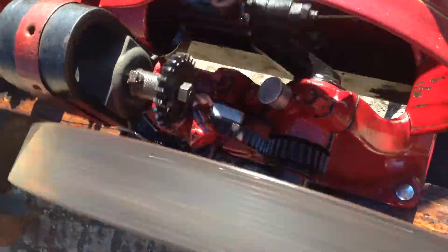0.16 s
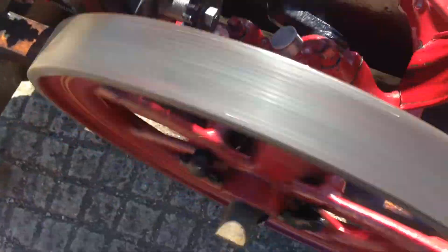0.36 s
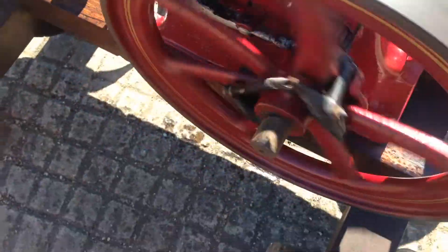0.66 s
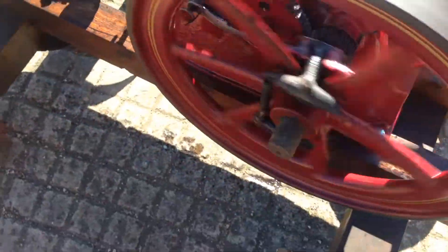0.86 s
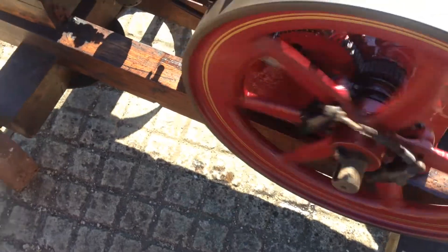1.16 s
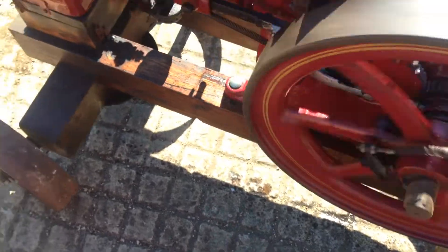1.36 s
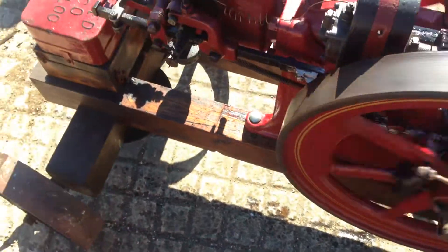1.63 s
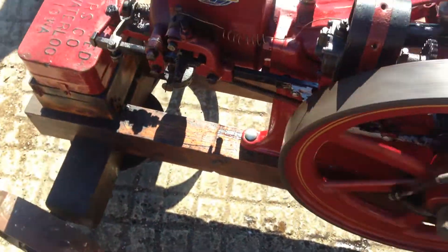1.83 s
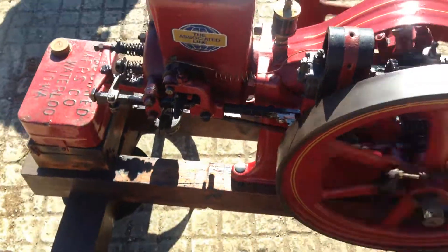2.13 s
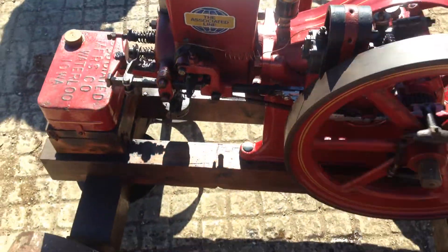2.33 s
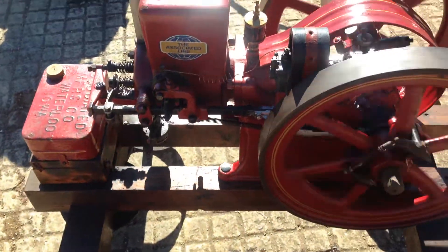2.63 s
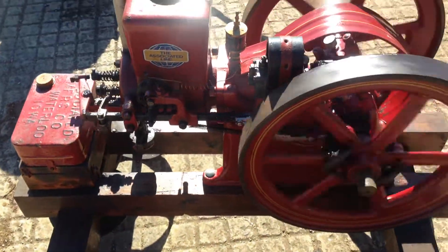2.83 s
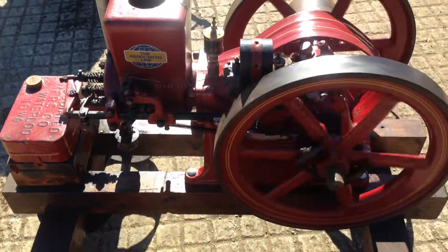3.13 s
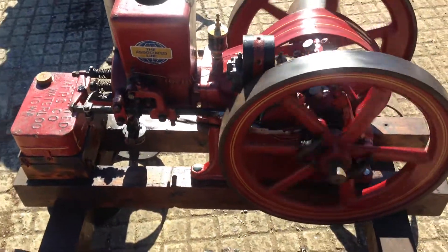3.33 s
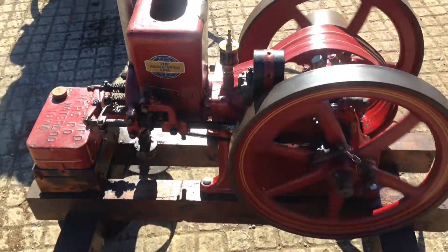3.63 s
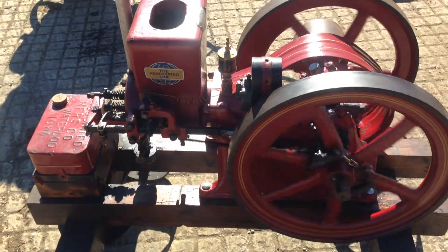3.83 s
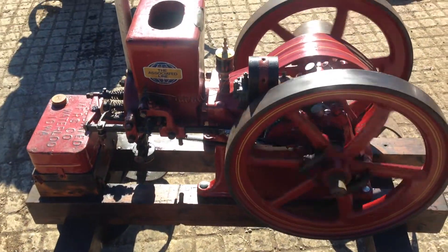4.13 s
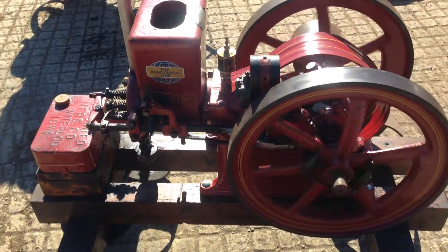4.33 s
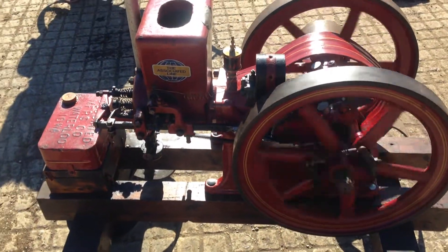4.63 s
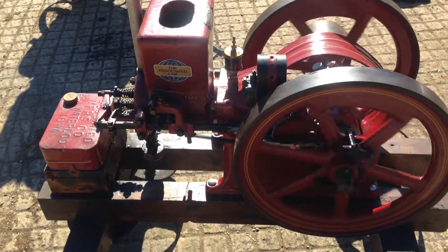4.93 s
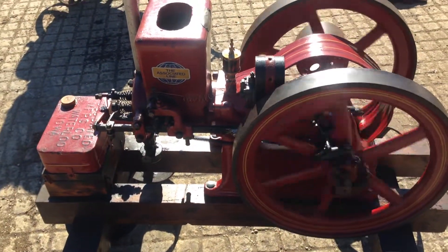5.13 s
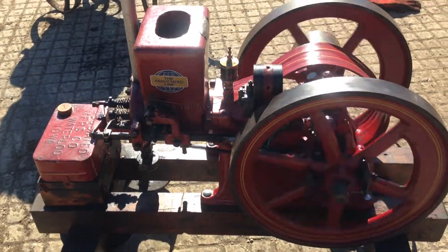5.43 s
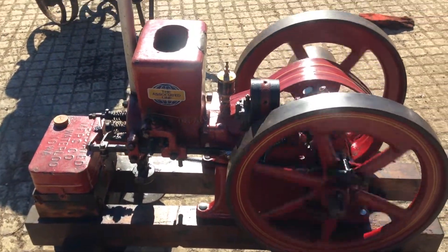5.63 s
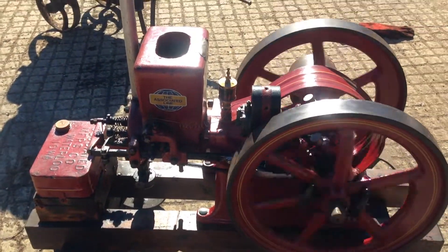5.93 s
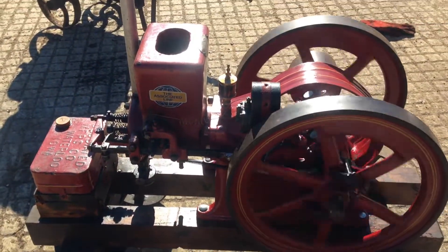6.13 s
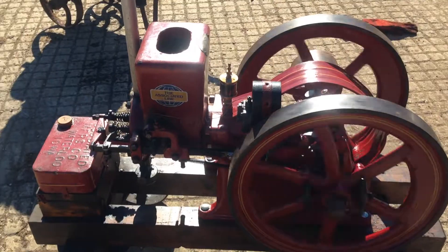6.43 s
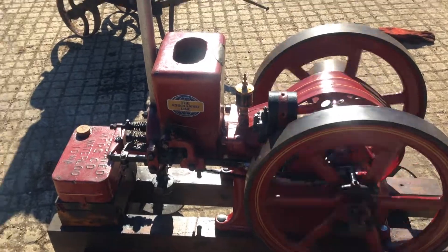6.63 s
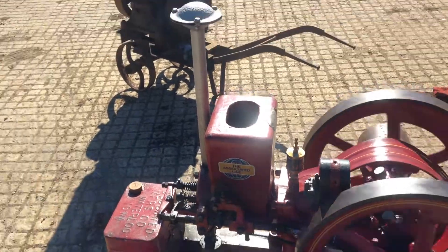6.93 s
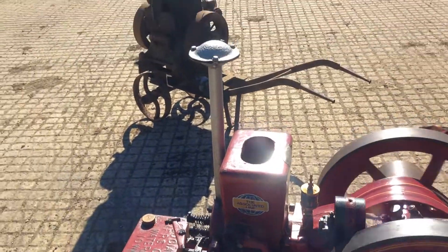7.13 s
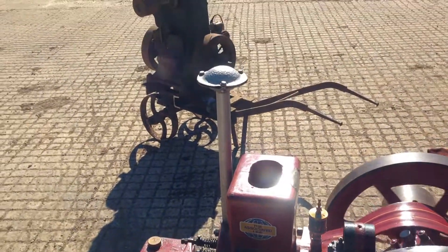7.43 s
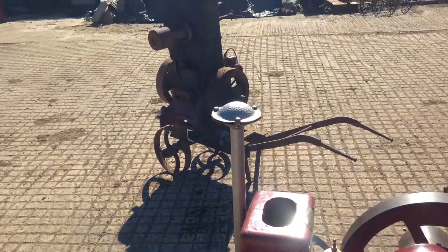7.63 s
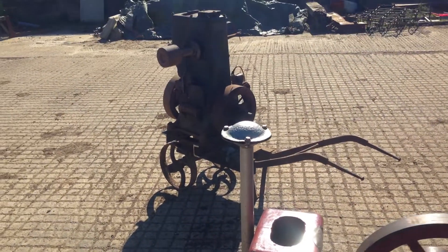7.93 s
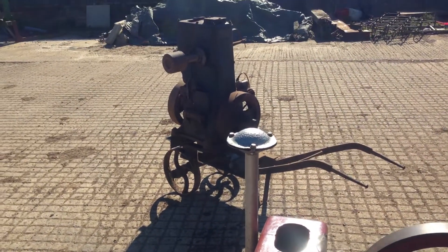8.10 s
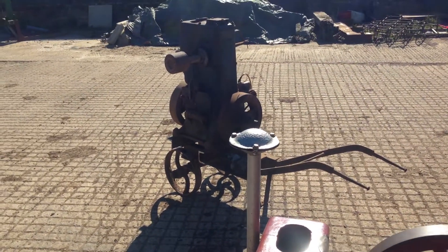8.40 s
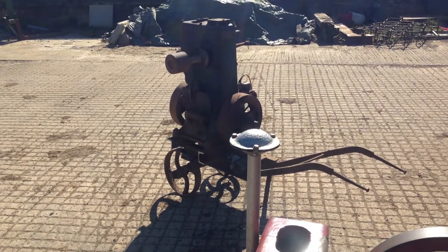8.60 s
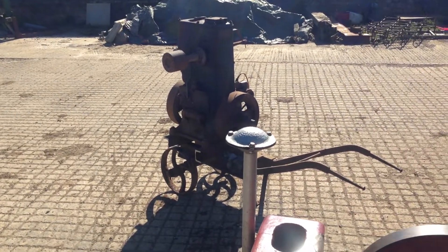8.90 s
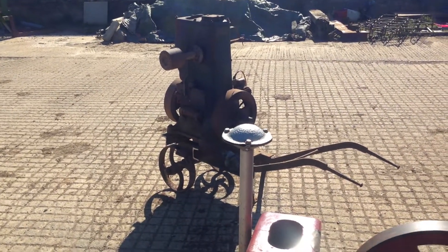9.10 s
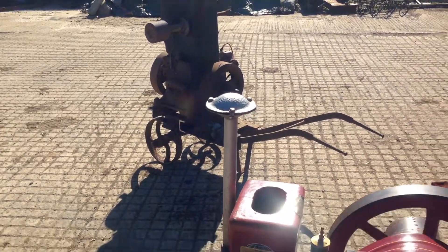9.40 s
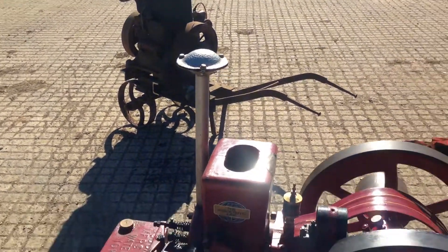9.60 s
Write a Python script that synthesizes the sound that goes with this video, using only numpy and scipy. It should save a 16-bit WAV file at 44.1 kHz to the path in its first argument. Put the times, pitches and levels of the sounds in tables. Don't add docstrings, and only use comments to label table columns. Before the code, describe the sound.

In an open paved yard, an antique flywheel engine turns over with regular steel clacks, light joint ticks and soft, hollow air puffs. Two firing cycles interrupt it: fuzzy intake hiss, latch and igniter snaps, then a booming pop, the second softer. The handheld microphone starts near, moves off, and ducks after each blast.

```python
import sys
import numpy as np
from scipy import signal
from scipy.fft import rfft, irfft
from scipy.io import wavfile
from scipy.ndimage import uniform_filter1d

SR = 44100
rng = np.random.default_rng(int(sys.argv[2]) if len(sys.argv) > 2 else 0)


def to_wav(sig):
    pcm = np.clip(np.atleast_2d(sig), -1, 1) * 32767
    pcm = np.round(pcm).astype(np.int16)
    wavfile.write(sys.argv[1], SR, pcm.T)


def boost(x):
    u = np.asarray(x, float) / 20
    return 10 ** u


N = 430416

# [f/Hz, width/Hz, level/dB]
FRAME_MODES = [(180, 150, -15), (338, 29.4, 2), (563.5, 50, -1.5), (886, 210, -12)]
# [f/Hz, width/Hz, level/dB]
CASTING_MODES = [(1018, 230, -6), (1270, 74, -1.5), (1650, 240, -5), (1950, 920, -8.5), (2372, 74, -2),
                 (3114, 520, -14.5), (3640, 1090, -11.5), (5000, 1600, -28.5)]
# [f/Hz, width/Hz, level/dB]
STEEL_MODES = [(5560, 3750, 6.5), (6860, 2100, 4), (7150, 700, 5.5), (9300, 750, -15), (13500, 4200, -23)]
# [t/s, peak level/dB, f/Hz, treble level/dB re peak, frame thud level/dB]
CAM_TURNS = [(-.007, -14, 1970, -13.5, -27.5), (.4192, -8.5, 1650, -11, -33),
             (.8636, -10.5, 1460, -18, -17.5), (1.3266, -7.5, 2330, -14.5, -26),
             (1.8127, -4, 2350, -11.5, -47), (2.3281, -5, 1635, -14.5, -15.5),
             (2.8814, -13, 1270, -24, -20), (3.3852, -15.5, 1930, -32, -41),
             (3.7775, -16, 1810, -26, -24.5), (4.1839, -11.5, 1900, -12.5, -27),
             (4.607, -8, 1914, -16, -46), (5.048, -15, 1280, -21, -21.5),
             (5.5099, -13.5, 1260, -18.5, -20.5), (5.9961, -6.5, 1940, -16.5, -24.5),
             (6.506, -8.5, 1270, -15.5, -22), (7.0576, -15.5, 1940, -32, -25),
             (7.5666, -18, 1270, -14.5, -28), (7.9675, -12.5, 2060, -12.5, -48),
             (8.3862, -15.5, 1950, -10.5, -33.5), (8.8216, -14, 2060, -13, -43),
             (9.2797, -14.5, 1270, -17, -23), (9.748, -20.5, 1950, -13, -50)]
# [t/s, level/dB]
FIRINGS = [
    (2.8817, 0.5),
    (7.0572, -2.1),
]
# [t/s, level/dB]
DISTANCE = [(0, -1), (2, -2.5), (3.2, -7), (6.5, -5.5), (8, -10), (9.76, -5.5)]
# [share of the turn, pipe air level/dB, port air level/dB, gear load level/dB above rest]
STROKES = [
    (0.028, 18, 11, 12),
    (.21, 7, 9, 2),
    (.475, 13.5, 12, 2.5),
    (.72, 8, 8.5, -1),
    (.87, 9.5, 7, 8.5),
]
# [from t/s, to t/s, level/dB]
VALVES_SHUT = [
    (3.077, 3.221, -2),
    (7.22, 7.452, -3),
]
# [f/Hz, width/Hz, level/dB]
PIPE_MODES = [(263, 73, -4.5), (370.6, 72, 2.5), (400.8, 45.7, 2)]
# [f/Hz, width/Hz, level/dB]
PORT_MODES = [(641, 157, -1.5), (690, 112, 0.5), (802, 118, -7)]
# [f/Hz, width/Hz, level/dB]
MESH_MODES = [(1270, 161, 4), (1780, 38, 7.5), (1950, 197, 1), (2364, 450, -14), (3060, 63, -2.5),
              (3700, 4040, -15), (5200, 580, -9)]
# [f/Hz, level/dB per Hz]
FLOOR_SPECTRUM = [(59, -38), (100, -7), (189, -0.5), (388, -10), (460, -27), (632, 1), (1860, -3.5),
                  (14300, -33.5), (15800, -59)]
# [f/Hz, width/Hz, level/dB]
PIN_MODES = [(2900, 87, -77), (3840, 140, -63.5)]
# [t/s, peak level/dB, decay/(dB/s) either side]
GUSTS = [(0, -55, 42), (.46, -32.5, 303), (1.14, -39, 143), (1.32, -31.5, 113), (1.41, -40, 500),
         (1.6, -57, 64), (1.69, -40, 500), (1.94, -28.5, 400), (2.1, -59.5, 42.5), (2.43, -32, 900),
         (2.9, -47, 61), (3.085, -26, 298), (3.14, -42, 397), (3.26, -33.5, 114.5), (4.4, -62, 23.5),
         (5.75, -59, 28), (7.45, -49.5, 31.5), (8.42, -55, 49), (9.55, -58.5, 24.5)]
# [f/Hz, level/dB per Hz]
GUST_SPECTRUM = [(12, -60), (20, -1), (70, 8), (147, 3), (230, -2), (264, -7), (400, -6), (520, -12.5),
                 (880, -120)]
# [t/s, level/dB]
CHIRPS = [(0.023, -53), (.122, -56), (.17, -65), (.21, -64), (.275, -59), (.4, -80), (.522, -59),
          (.62, -68), (.735, -67), (.83, -74)]
# [share of the turn, peak level/dB, f/Hz, treble level/dB, slack/(dB per s of slower turn)]
JOINTS = [(.116, -35, 1540, -13, 90), (.202, -26, 1700, -27, 0), (.277, -41, 1990, -27, 50),
          (.402, -39, 1640, -19, 80), (.476, -26.5, 1200, -26, -10), (.622, -38, 1640, -14, 110),
          (.702, -26, 1700, -28, -20), (.765, -30, 1780, -23, 10), (.887, -42, 1640, -26, 90)]
# [t/s, peak level/dB, f/Hz]
LATCH_CATCHES = [(0.351, -28.5, 1770), (0.7921, -17, 1130), (1.253, -18, 1710), (1.736, -17, 2230),
                 (2.2663, -23, 1650), (3.713, -28, 1920), (4.1176, -32.5, 1990), (4.538, -25.5, 1800),
                 (4.977, -27.5, 1770), (5.4358, -19, 2444), (5.9187, -20, 2595), (6.4242, -24, 2370),
                 (7.923, -31.5, 1780), (8.32, -31, 1780), (8.7522, -24.5, 1810), (9.208, -25, 1890),
                 (9.682, -25.5, 2440)]
# [t/s after its clack, peak level/dB, f/Hz, treble level/dB, rattle/ms]
SNAPS = [(-.0975, -22.5, 1875, -36, 2.7), (-.07, -26, 1700, -21, 2.1), (-.058, -15, 2010, -23, 0.79),
         (-.012, -24, 1660, -26, 1.9), (.015, -12, 1940, -8.5, 4.9), (0.161, -16, 4360, -8, 3.3),
         (0.178, -29, 1970, -7.5, 3.1), (0.2443, -34.5, 2160, 0, 8), (0.3037, -13.5, 3800, -4, 4.2),
         (.325, -18, 4515, -16.5, 0.77), (.369, -13.5, 1760, -36.5, 0.79), (.382, -9.5, 924, -17, 1.5)]
# [t/s, level/dB]
INTAKE_STROKES = [
    [(2.9, -21), (2.915, -35.5), (2.94, -29), (2.98, -31.5), (3.005, -27), (3.025, -27), (3.042, -61)],
    [(7.075, -11.5), (7.095, -32.5), (7.14, -27.5), (7.165, -33.5), (7.185, -30.5), (7.2, -23),
     (7.218, -60)],
]
# [f/Hz, width/Hz, level/dB]
THROAT_MODES = [(2100, 120, 5.5), (2630, 210, -1), (4120, 360, 7), (6700, 340, -14), (8650, 330, -33),
                (11100, 170, -23), (14000, 500, -20)]
# [f/Hz, level/dB per Hz]
INTAKE_SPECTRUM = [(180, -54.5), (300, -26), (385, 3), (2130, 13), (3170, 6), (4200, -3), (15800, -74)]
# [from t/s, to t/s, first level/dB, last level/dB]
LEAKS = [
    (3.182, 3.311, -42, -29),
    (7.365, 7.484, -45, -32),
]
# [t/s of pressure drop, push level/dB, build-up/ms, recoil/ms, cap ring level/dB]
BLASTS = [
    (3.2928, 3, 0.99, 0.82, -63.5),
    (7.47, -0.5, 1.37, 1.6, -65),
]
# [f/Hz, level/dB per Hz]
EXHAUST_SPECTRUM = [(180, -48.5), (300, -17), (447, -12), (1660, 1.5), (2820, -4.5), (4960, -4),
                    (7510, -11), (8300, -11), (15100, -19.5), (15800, -30)]

# level between swells in dB, rise and fall widths in turns
REST_DB, RISE_TURNS, FALL_TURNS = (-9.5, -4.5, -3.5), (0.063, 0.11, 0.053), (0.074, 0.056, 0.092)
GEARS_DB, GEARS_FALL = -4, 0.77


def evened(x):
    return x / np.sqrt(np.mean(x ** 2) + 1e-20)


def distance_db():
    t, db = np.transpose(DISTANCE)
    return np.interp(np.arange(N) / SR, t, db)


def add(mix, s, sound):
    part = mix[max(round(s * SR), 0):][:len(sound)]
    part += sound[:len(part)]


def ring(x, modes):
    hz = np.fft.rfftfreq(len(x), 1 / SR) + 1
    gain = 0
    for k, (f, width, db) in enumerate(modes):
        gain = gain + (-1) ** k * boost(db) / (1 + 1j * (hz - f * f / hz) / width)
    return irfft(rfft(x) * gain, len(x))


def hiss(spectrum, size):
    f, db = np.transpose(spectrum)
    hz = np.fft.rfftfreq(size, 1 / SR) + 1
    gain = boost(np.interp(np.log(hz), np.log(f), db))
    return evened(irfft(rfft(rng.standard_normal(size)) * gain, size))


def lumps(per_s):
    lowpass = 1 / (1 + (np.fft.rfftfreq(N, 1 / SR) / per_s) ** 4)
    return evened(irfft(rfft(rng.standard_normal(N)) * lowpass, N))


def uneven(db, size):
    return boost(db * np.minimum(rng.exponential(1, size), 3))


def humps(rows, rest_db):
    t = np.arange(0, N, 64) / SR
    gain = boost(rest_db) + sum(boost(db - fall * abs(t - s)) for s, db, fall in rows)
    return np.interp(np.arange(N) / SR, t, gain)


def stroke_db(column):
    t = np.arange(N) / SR
    turns = np.interp(t, np.transpose(CAM_TURNS)[0], np.arange(len(CAM_TURNS)))
    layer = column - 1
    share, shape = np.linspace(0, 1, 512), REST_DB[layer]
    for row in STROKES:
        past = (share - row[0] + .5) % 1 - .5
        width = np.where(past < 0, RISE_TURNS[layer], FALL_TURNS[layer])
        shape = shape + row[column] * np.exp(-(past / width) ** 2)
    shut = sum(db * np.clip(np.minimum(t - a, b - t) / .02, 0, 1) for a, b, db in VALVES_SHUT)
    return np.interp(turns % 1, share, shape) + shut


def knock(db, hz, treble_db, rattle_ms, settle_db, settle_ms, bright_hz, size=4096):
    t = np.arange(size) / SR * 1000
    contacts = boost(2.4 * np.minimum(rng.exponential(1, size // 32), 4)).repeat(32)
    jolts = rng.standard_normal((3, size)) * contacts
    bodies = (STEEL_MODES, [*CASTING_MODES, (hz, 150, 2.5)], FRAME_MODES)
    parts = []
    for jolt, lag, modes in zip(jolts, (.45, 1.0, 1.4), bodies):
        u = t / (rattle_ms * lag)
        rattle = 0.52 * u * np.exp(-u ** 2 / 2)
        after = boost(settle_db) * (1 - np.exp(-u)) * np.exp(-t / settle_ms)
        part = ring(jolt * (rattle + after), modes)
        parts.append(part / abs(part).max())
    steel, casting, frame = parts
    bright, body = [(5200, bright_hz, 0.0033)], [(2160, 5800, 0)]
    steel = ring(ring(steel, bright), bright)
    casting = ring(ring(casting, body), body)
    return boost(db) * (boost(treble_db + 4.5) * steel + casting), frame


def add_rod_knock(mix, s, db, hz, treble_db):
    bright_hz = max(17002 + 380 * db, 2500)
    metal, frame = knock(db, hz, treble_db, 4.0 + 0.063 * db, 6.8, 5.55, bright_hz, size=2048)
    add(mix, s - .0008, metal + boost(0.98 * db - 23) * frame)


def add_tick(mix, s, db, hz, treble_db):
    metal, frame = knock(db, hz, treble_db, 3.2, 1.3, 9.4, 7800, size=2048)
    add(mix, s - .0012, metal + boost(db - 16.5) * frame)


def push_rod():
    out = np.zeros(N)
    for s, db, hz, treble_db, thud_db in CAM_TURNS:
        add_tick(out, s - .003, db - 15.5, hz, treble_db)
        add_rod_knock(out, s, db, hz, treble_db)
        _, frame = knock(0, 1000, 0, 3.3, -34, 6.3, 5000)
        add(out, s, boost(thud_db) * frame)
    return out


def pumped_air():
    pipe = ring(ring(rng.standard_normal(N), PIPE_MODES), [(373, 520, 0)])
    port = ring(ring(rng.standard_normal(N), PORT_MODES), [(663, 1500, 0)])
    pipe = boost(-43.5 + stroke_db(column=1) + 4.34 * lumps(30)) * evened(pipe)
    port = boost(-45 + stroke_db(column=2) + 2.3 * lumps(30)) * evened(port)
    return boost(distance_db()) * (pipe + port)


def gears():
    taps = rng.standard_normal(N) * uneven(3.2, N) * (rng.random(N) < 900 / SR)
    rattle = evened(ring(taps * boost(3.2 * lumps(27)), MESH_MODES))
    load_db = stroke_db(column=3)
    floor = boost(-46.5 + 0.67 * load_db) * hiss(FLOOR_SPECTRUM, N)
    return boost(GEARS_DB + GEARS_FALL * distance_db()) * (boost(-42 + load_db) * rattle + floor)


def loose_pins():
    out = np.zeros(N)
    for hz, width, db in PIN_MODES:
        hits = uneven(3., N) * (rng.random(N) < 30 / SR)
        out += boost(db) * evened(ring(hits, [(hz, width, 0)]))
    level_db = GEARS_DB + GEARS_FALL * distance_db() + 1.9 * stroke_db(column=3)
    return boost(level_db) * ring(out, [(4000, 9300, 0.042)])


def wind():
    return humps(GUSTS, -71.5) * boost(1.8 * lumps(28)) * hiss(GUST_SPECTRUM, N)


def magneto():
    teeth = uneven(4.5, N) * (rng.random(N) < 73 / SR)
    decay = np.exp(-1 / (0.0023 * SR))
    contact = .12 + evened(signal.lfilter([1], [1, -decay], teeth))
    rub = rng.standard_normal(N) * contact
    both = ring(ring(rub, [(5660, 290, 1.5), (10640, 140, -.5)]), [(5500, 870, 0), (10500, 700, 0.03)])
    low = ring(ring(rub, [(5670, 140, 0)]), [(5520, 510, 0)])
    near = humps([(s, db + 7.5, 602) for s, db in CHIRPS], -120)
    whine_db = -67.5 + 1.2 * distance_db() + 0.24 * stroke_db(column=3)
    return near * evened(both) + boost(whine_db) * evened(low)


def joint_ticks():
    usual_turn_s, drag = .45, .2
    out = np.zeros(N)
    starts = np.transpose(CAM_TURNS)[0]
    for start, length in zip(starts, np.diff(starts)):
        if min(abs(start - s) for s, _ in FIRINGS) <= .1:
            continue
        near_db = .8 * np.interp(start, *np.transpose(DISTANCE))
        slower_s = length - usual_turn_s
        for share, db, hz, treble_db, slack in JOINTS:
            chance_db, chance_hz = rng.standard_normal(2) * (1.8, 150)
            s = start + share * length * (1 - drag * share * slower_s)
            add_tick(out, s, db + slack * slower_s + near_db + chance_db, hz + chance_hz, treble_db)
    return out


def latch():
    out = np.zeros(N)
    for s, db, hz in LATCH_CATCHES:
        add_rod_knock(out, s, db, hz, -25)
    return out


def firing_snaps():
    out = np.zeros(N)
    for start, fire_db in FIRINGS:
        for s, db, hz, treble_db, rattle_ms in SNAPS:
            bright_hz = max(29998 + 1100 * treble_db, 3500)
            metal, frame = knock(db, hz, treble_db, rattle_ms, 2.5, 8.5, bright_hz)
            add(out, start + s - .0015, boost(fire_db) * (metal + boost(db - 19.5) * frame))
    return out


def intake():
    out = np.zeros(N)
    for rows in INTAKE_STROKES:
        s, db = np.transpose(rows)
        t = np.arange(s[0], s[-1], 1 / SR)
        whistle = evened(ring(rng.standard_normal(len(t)), THROAT_MODES))
        air = whistle + 0.58 * hiss(INTAKE_SPECTRUM, len(t))
        add(out, s[0], boost(np.interp(t, s, db) - 3.5) * air * signal.windows.tukey(len(t), .15))
    return out * boost(2.8 * lumps(93) + 0.94 * lumps(600))


def valve_leak():
    out = np.zeros(N)
    for a, b, first_db, last_db in LEAKS:
        size = round((b - a) * SR)
        add(out, a, boost(np.linspace(first_db, last_db, size)) * hiss(EXHAUST_SPECTRUM, size))
    return out


def exhaust():
    out, lead_s = np.zeros(N), .03
    t = np.arange(-lead_s, .4, 1 / SR) * 1000
    for s, push_db, build_ms, recoil_ms, cap_db in BLASTS:
        flank = np.where(t < 0, np.exp(-abs(t) / build_ms), np.exp(-abs(t) / recoil_ms))
        push = -np.tanh(t / .28) * flank
        boom = boost(-28.5) * np.sin(2 * np.pi * 0.18 * t) * np.exp(-abs(t) / 22) * (t > 0)
        u = np.maximum(t - .7, 0) / 10.75
        burst = 2.17 * np.sqrt(u) * np.exp(-u ** 2 / 2)
        jet = burst + boost(-10.0) * (1 - np.exp(-u)) * np.exp(-t / 35)
        roar = boost(-13) * jet * hiss(EXHAUST_SPECTRUM, len(t))
        cap = boost(cap_db) * np.sin(2 * np.pi * 6.65 * t) * np.exp(-t / 150) * (t > 0)
        add(out, s - lead_s, boost(push_db) * (push - boom) + roar + cap)
    return out


def scene():
    engine = push_rod() + pumped_air() + gears() + loose_pins()
    near = wind() + magneto() + joint_ticks() + latch()
    firing = firing_snaps() + intake() + valve_leak() + exhaust()
    return (engine + near + firing)[None]


def band_limit(x):
    return signal.sosfilt(signal.butter(12, 16000, fs=SR, output="sos"), x)


def record(dry):
    x = signal.sosfilt(signal.butter(2, 55, "high", fs=SR, output="sos"), dry)
    x = x + boost(-75) * rng.standard_normal(dry.shape)
    power_db = 10 * np.log10(abs(uniform_filter1d(x[0] ** 2, 2200)) + 1e-12)
    fall = np.arange(N) * 13.5 / SR
    held_db = np.maximum.accumulate(power_db + fall) - fall
    over_db = uniform_filter1d(np.maximum(held_db + 22, 0), 2600)
    late_db = np.interp(np.arange(N) - .07 * SR, np.arange(N), over_db)
    x = x / boost(0.83 * late_db)
    edge = signal.firwin(301, 15400, window=("kaiser", 6), fs=SR)
    x = signal.oaconvolve(0.79 * np.tanh(x / 0.81), edge[None], "same")
    return band_limit(x)


dry = scene()
out = record(dry)
to_wav(out)
```